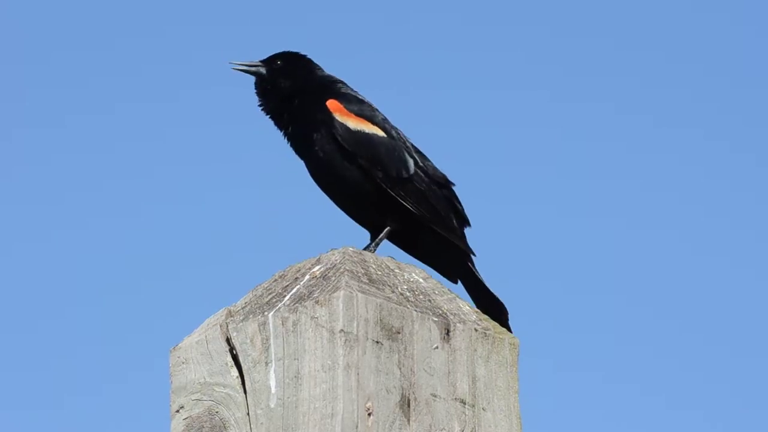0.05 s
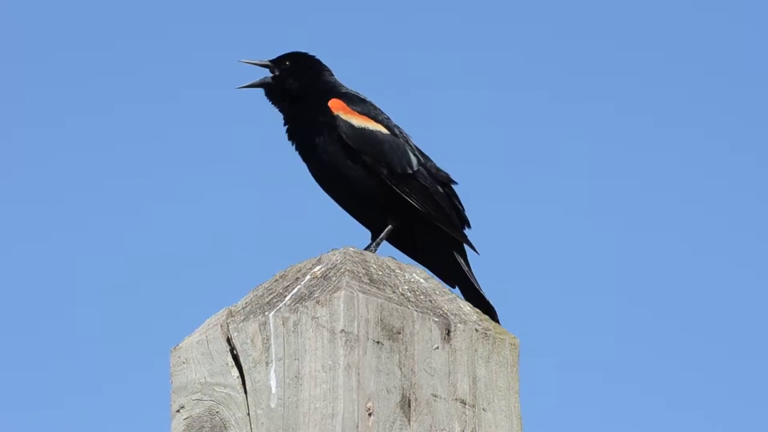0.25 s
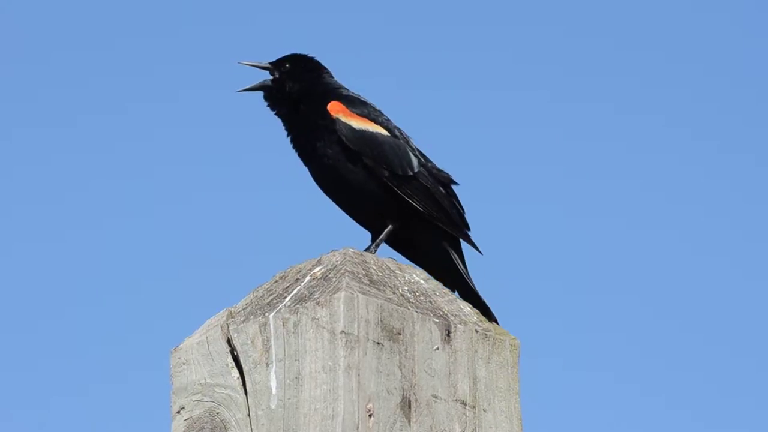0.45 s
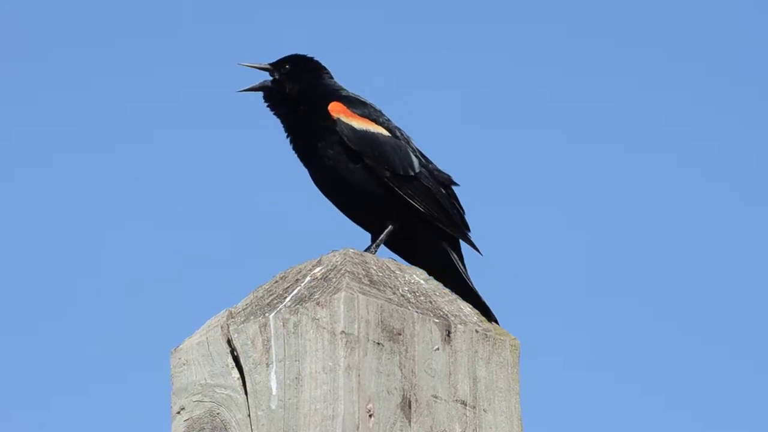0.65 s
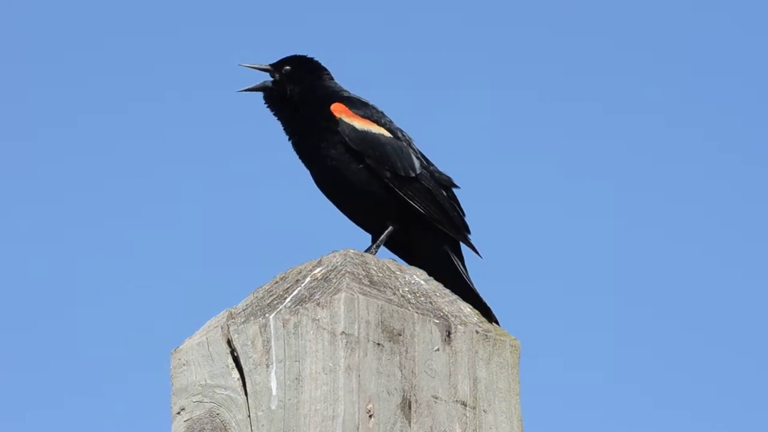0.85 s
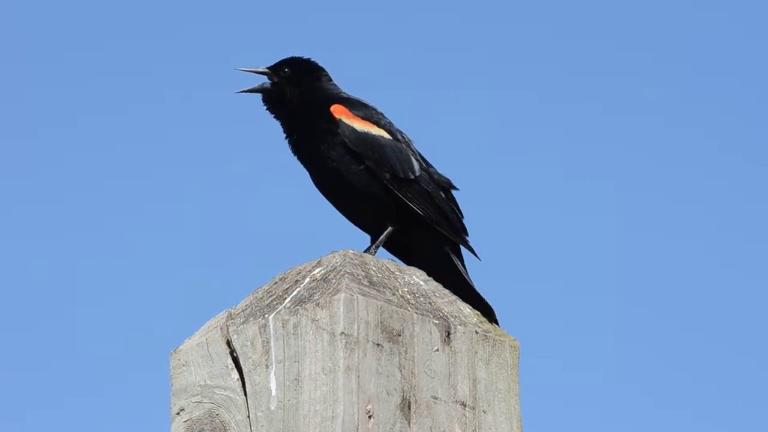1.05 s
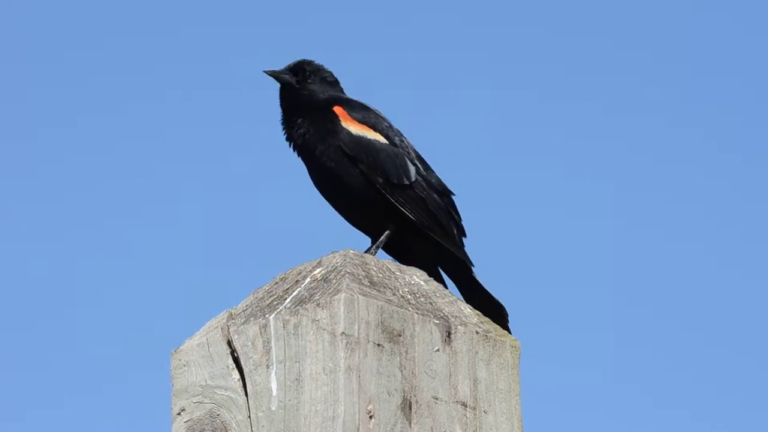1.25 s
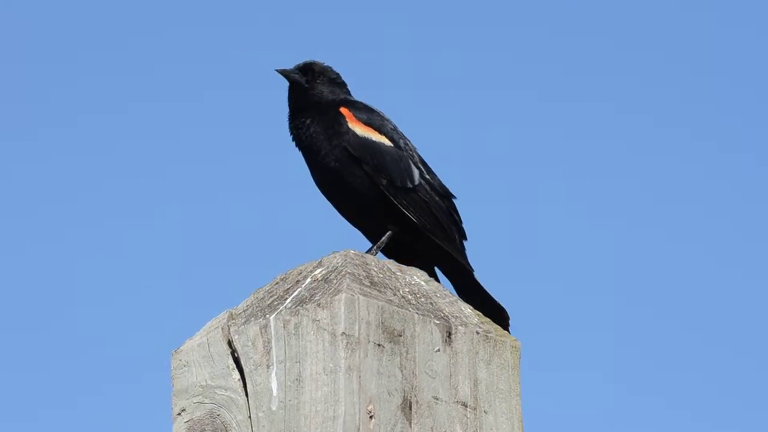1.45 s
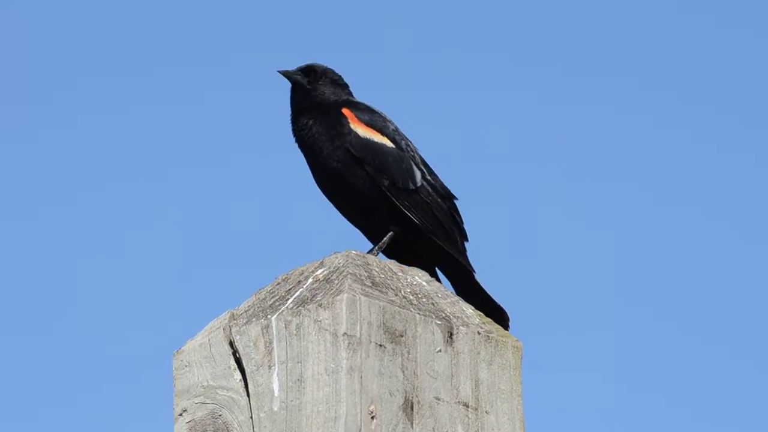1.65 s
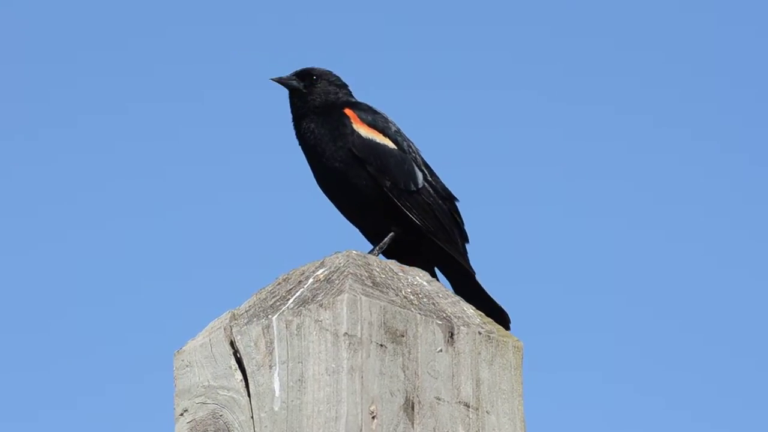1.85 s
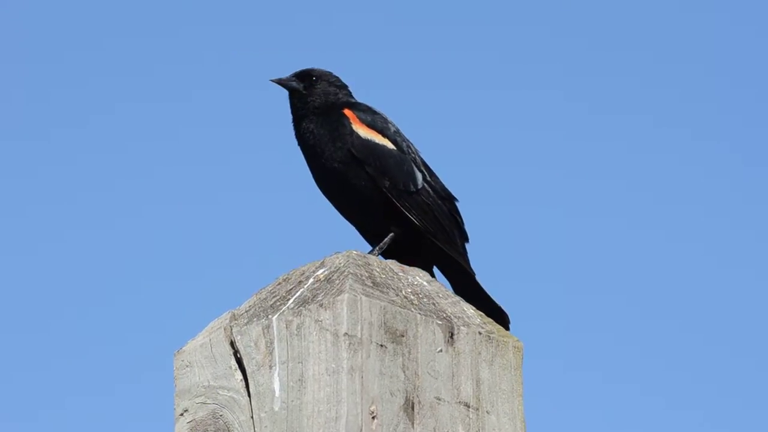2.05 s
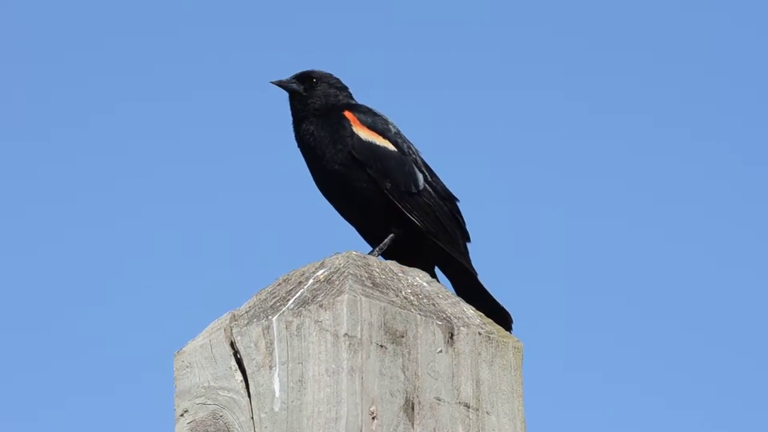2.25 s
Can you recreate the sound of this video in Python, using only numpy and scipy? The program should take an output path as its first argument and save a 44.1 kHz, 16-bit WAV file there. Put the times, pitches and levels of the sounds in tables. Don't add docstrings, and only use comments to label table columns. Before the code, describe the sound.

One blackbird sings close to the microphone in an open field: soft gurgled notes, a loud clear whistle, then a fast buzzing trill ending after one second, leaving faint distant birds and low traffic rumble.

```python
import sys
import numpy as np
from scipy import signal
from scipy.fft import rfft, irfft
from scipy.io import wavfile
from scipy.ndimage import uniform_filter1d

SR = 44100
rng = np.random.default_rng(int(sys.argv[2]) if len(sys.argv) > 2 else 0)


def linear_from_db(decibels):
    return 10 ** (np.asarray(decibels, float) / 20)


def digitize_waveform(pressure):
    field = np.atleast_2d(pressure).T
    bounded = np.clip(field, -1, 1)
    quanta = np.round(bounded * 32767).astype(np.int16)
    wavfile.write(sys.argv[1], SR, quanta)


N = 101429

# multiple of the pitch, level in dB.
UPPER_TONE = [(1, -2.5), (2.5, -52), (4.4, -53), (5.2, -54)]


def evened(x):
    return x / np.sqrt(np.mean(x ** 2) + 1e-20)


def add(mix, start_s, sound):
    part = mix[max(round(start_s * SR), 0):][:len(sound)]
    part += sound[:len(part)]


def wobble(count, hz):
    size = max(int(SR / hz / 2), 2)
    once = uniform_filter1d(rng.standard_normal(count), size)
    return evened(uniform_filter1d(once, size))


def sing(pitch_hz, tone, jitter, shimmer_db, open_db=0, blur_hz=900, effort_db=0):
    blur_from_hz = 5900
    count = len(pitch_hz)
    unsteady_hz = pitch_hz * (1 + jitter * wobble(count, 300))
    phase = 2 * np.pi * (np.cumsum(unsteady_hz) / SR + rng.random())
    wave = 0
    for multiple, partial_db in tone:
        smear = 1
        if blur_hz and multiple * np.mean(pitch_hz) > blur_from_hz:
            smear = wobble(count, blur_hz * multiple / 4) * linear_from_db(effort_db)
        beak_db = open_db * (multiple in (2, 3))
        wave = wave + linear_from_db(partial_db + beak_db) * smear * np.cos(multiple * phase)
    return np.sqrt(2) * wave * linear_from_db(shimmer_db * wobble(count, 200))


def rasp(count):
    # centre in Hz, width in Hz, level in dB.
    throat = [(2672.5, 530, -0.5), (3186, 67, 4.5), (3550, 180, 2.5), (3880, 280, -6), (4473, 1000, -14.5),
              (4910, 250, -14.5), (6800, 3500, -46.5)]
    bin_hz = np.fft.rfftfreq(count, 1 / SR)
    colour = 0
    for mid_hz, width_hz, peak_db in throat:
        colour = colour + linear_from_db(peak_db) / (1 + (2 * (bin_hz - mid_hz) / width_hz) ** 4)
    return evened(irfft(rfft(rng.standard_normal(count)) * colour, count))


def note(curve, tone, beat_hz=0, beat=0, jitter=0.0051, shimmer_db=3.0, blur_hz=900, haze_db=-30):
    s, pitch_hz, level_db, *beak = np.transpose(curve)
    t = np.arange(s[0], s[-1], 1 / SR)
    t_db = np.interp(t, s, level_db)
    open_db = np.interp(t, s, beak[0]) if beak else 0
    effort_db = .3 * (t_db - level_db.max())
    wave = sing(np.interp(t, s, pitch_hz), tone, jitter, shimmer_db, open_db, blur_hz, effort_db)
    wave = wave + linear_from_db(haze_db) * rasp(len(t))
    loudest_s = s[np.argmax(level_db)]
    beating = 1.5 + beat * np.cos(2 * np.pi * beat_hz * (t - loudest_s))
    edge = np.minimum(np.minimum(t - s[0], s[-1] - t) / .0015, 1)
    return s[0], wave * beating * edge * linear_from_db(uniform_filter1d(t_db, size=31))


def products(mix, low, high, db, order):
    start_s, end_s = max(low[0][0], high[0][0]), min(low[-1][0], high[-1][0])
    t = np.arange(start_s, end_s, 1 / SR)
    low_s, low_hz, low_db = np.transpose(low)
    high_s, high_hz, high_db = np.transpose(high)
    weaker_db = np.minimum(np.interp(t, low_s, low_db), np.interp(t, high_s, high_db))
    level = linear_from_db(weaker_db + db) * signal.windows.tukey(len(t), .2)
    for low_times, high_times, side_db in order:
        side_hz = low_times * np.interp(t, low_s, low_hz) + high_times * np.interp(t, high_s, high_hz)
        add(mix, t[0], level * sing(side_hz, [(1, side_db)], 0.0081, 4.1))


def intro():
    # time in seconds, pitch in Hz, level in dB.
    hum, partner, gulp = [(0, 1507, -35), (.008, 1491, -39), (.018, 1519, -29), (.036, 1550, -41.5),
                          (.11, 1527, -32.5), (.117, 1488, -32.5), (.123, 1591, -28.5), (.16, 1560, -31.5),
                          (.188, 1548, -43.5)], [(.116, 1778, -48.5), (.121, 1847, -23), (.14, 1884, -31.5),
                                       (.148, 1930, -34.5), (.16, 1878, -28.5), (.19, 1850, -44.5)], [(.18, 1186, -45), (.19, 1133, -27),
                                                        (.198, 1148, -23), (.207, 1253, -29),
                                                        (.214, 1187, -46.5)]
    chuck, squeak, bridge = [(.2, 2350, -45), (.212, 2480, -30), (.217, 2440, -31), (.2222, 2430, -19),
                             (.228, 2450, -30), (.237, 2480, -28.5), (.243, 2400, -36), (.256, 2580, -35),
                             (.262, 2500, -43)], [(.241, 3765, -50.5), (.248, 3777, -29), (.252, 3550, -28),
                                            (.257, 3463, -20.5), (.264, 3495, -25), (.279, 3490, -33),
                                            (.3, 3400, -47.5)], [(.26, 3390, -46), (.266, 3392, -31.5),
                                                            (.273, 3380, -36), (.279, 3400, -33),
                                                            (.29, 3320, -45.5), (.305, 3320, -54)]
    # time in seconds, pitch in Hz, level in dB, beak opening in dB on partials 2 and 3.
    whistle = [(.278, 2520, -42.5, 21.5), (.294, 2511, -23, 7), (.307, 2493, -11.5, -1),
               (.324, 2477, -11, -15), (.339, 2476, -10.5, 0.5), (.349, 2468, -21.5, 24.5),
               (.356, 2516, -20, 18.5), (.384, 2513, -26.5, 29), (.402, 2505, -39.5, 20.5)]
    # multiple of the pitch, level in dB.
    hum_tone, partner_tone, pure_tone = [(1, -4), (2, -26), (4, -40)], [(1, -5), (3.4, -33), (5.8, -47), (7.5, -52)], [(1, -1.5), (2, -36.5),
                                                                                 (3, -69.5), (4, -62.5),
                                                                                 (5, -48.5), (6, -60)]
    chuck_tone, squeak_tone, bridge_tone = [(1, -1), (2.6, -44), (4.6, -49)], [(1, -2.5), (2, -42), (4, -49.5)], [(.5, -7), (1, -9.5),
                                                                                     (1.5, -9.5), (2, -29),
                                                                                     (3, -41), (4, -42)]
    song = np.zeros(N)
    add(song, *note(hum, hum_tone, jitter=.003, shimmer_db=1.8, blur_hz=0))
    add(song, *note(partner, partner_tone, jitter=0.015, shimmer_db=3.0))
    add(song, *note(gulp, pure_tone, beat_hz=115, beat=.2, shimmer_db=1))
    add(song, *note(chuck, chuck_tone, beat_hz=260, beat=.9, jitter=.014, shimmer_db=1, haze_db=-28))
    add(song, *note(squeak, squeak_tone, beat_hz=265, beat=.5, jitter=.024, shimmer_db=1.5, haze_db=-11))
    add(song, *note(bridge, bridge_tone, jitter=0.011, shimmer_db=4.0))
    add(song, *note(whistle, pure_tone, jitter=0.0016, shimmer_db=0.62, blur_hz=0, haze_db=-47))
    early = [(0, 2356, -53.5), (.06, 2354, -56.5), (.105, 2375, -46.5), (.116, 2387, -38.5), (.123, 2262, -48)]
    add(song, *note(early, UPPER_TONE, beat_hz=320, beat=.4, jitter=0.004, shimmer_db=4.0))
    order = [(-1, 1.5, 3.5), (-1, 2, 3.0), (-4.0, 1.5, -11.0), (2.5, -0.5, -6.5)]
    products(song, hum, partner, -13.0, order)
    return song


def buzz(start_s, length_s, db, rise_s, fade_s=0):
    # multiple of the pitch, level in dB.
    buzz_tone = [(.5, -11.5), (1, -4.5), (1.5, -19), (3, -44.5)]
    warble_hz, sweep_low_hz, sweep_top_hz, dwell = 124.16, 2640, 4024, 1.8
    lower_hz, lower_swing, lower_db = 3250, 0.036, -4
    rasp_db, fall_s = 3, .014
    length_s = length_s + fade_s
    t = np.arange(0, length_s, 1 / SR)
    cycle = 2 * np.pi * np.cumsum(warble_hz * (1 + 0.069 * wobble(len(t), 79))) / SR

    up = (.5 - .5 * np.cos(cycle)) ** dwell
    top_hz = sweep_top_hz * (1 + 0.051 * wobble(len(t), 74))
    upper = sing(sweep_low_hz + (top_hz - sweep_low_hz) * up, buzz_tone[1:2], 0.016, 2.8)
    upper = upper * (1 + 0.61 * np.sin(cycle))

    lower = sing(lower_hz * (1 + lower_swing * np.sin(cycle + 0.68)), buzz_tone, 0.022, 4.8)
    lower = lower * (1 - 0.4 * np.cos(cycle + 1.8))
    breath = rasp(len(t)) * (1 - 0.18 * np.cos(cycle))

    ramps = np.minimum((t / rise_s) ** 2, (length_s - t) / (fall_s + 2 * fade_s))
    shape = np.sin(np.pi / 2 * np.minimum(ramps, 1)) * linear_from_db(-5 * t / length_s)
    return start_s, linear_from_db(db) * shape * (upper + linear_from_db(lower_db) * lower + linear_from_db(rasp_db) * breath)


def trill():
    # start in seconds, length in seconds, level in dB, rise in seconds.
    first_buzz = (.377, .102, -22, .058)
    # start in seconds, strength in dB, blip level in dB, chord pitch ratio.
    turns = [(0.4790, 0.07, .5, 1.008), (0.5781, 0, -2, 1), (0.6775, -0.66, -.6, 1),
             (0.7764, -1.03, 0, .998), (0.8759, -1.56, -.6, 1), (0.9757, -2.71, 1.5, 1)]
    # seconds after its start, pitch in Hz, level in dB.
    blip, upper_voice, lower_voice = [(-.0012, 2590, -35.5), (.0006, 2600, -13.5), (.0027, 2600, -24),
                                      (.005, 2620, -12.5), (.0072, 2700, -20), (.009, 2760, -35)], [(.009, 2600, -40.5), (.014, 2610, -28.5),
                                                    (.024, 2620, -27), (.04, 2640, -22.5),
                                                    (.049, 2740, -19), (.053, 2760, -35.5)], [(.008, 3150, -27), (.014, 3150, -28),
                                                                   (.028, 3145, -27.5), (.043, 3100, -19.5),
                                                                   (.047, 3320, -33.5), (.051, 3500, -33),
                                                                   (.055, 3550, -42.5)]
    # multiple of the pitch, level in dB.
    lower_tone = [(.5, -22), (1, 0), (1.5, -15), (2, -40), (2.5, -54), (3, -58), (4.5, -54)]
    buzz_after_s, buzz_s, buzz_db, buzz_rise_s, last_fade_s = .048, 0.055, -25, .008, .036
    song = np.zeros(N)
    add(song, *buzz(*first_buzz))
    for start_s, turn_db, blip_db, ratio in turns:
        tuning, shift = np.array([1, ratio, 1]), np.array([start_s, 0, turn_db])
        upper = upper_voice * tuning + shift
        lower = lower_voice * tuning + shift
        blip_now = blip + np.array([start_s, 0, blip_db])
        add(song, *note(blip_now, UPPER_TONE[::3], jitter=.004, shimmer_db=-0.5))
        add(song, *note(upper, UPPER_TONE, beat_hz=110, beat=.55, jitter=.017, shimmer_db=3, haze_db=-18))
        add(song, *note(lower, lower_tone, jitter=0.004, shimmer_db=0.2, blur_hz=200, haze_db=-24))
        products(song, lower, upper, -22, order=[(.5, 1, 3.5), (-1, 2, -3.5), (2.5, -0.75, -16)])
        fade_s = last_fade_s * (start_s == turns[-1][0])
        add(song, *buzz(start_s + buzz_after_s, buzz_s, buzz_db + turn_db, buzz_rise_s, fade_s))
    return song


def air(bird):
    # frequency in Hz, level in dB per Hz.
    beak_hiss = [(6000, -14.5), (8000, -12), (9300, -18), (11000, -4.5), (12200, -6), (14000, -1.5),
                 (15500, -7.5)]
    # time in seconds, level in dB.
    pressure = [(.07, -15.5), (.11, 10), (.17, 3), (.2, -3), (.27, 8.5), (.29, -23.5), (.44, -24.5),
                (0.499, -6.5), (.8, -4), (1.03, 3.5), (1.071, -10)]
    air_db, smooth_s = -46.5, .014
    effort = np.sqrt(abs(uniform_filter1d(bird ** 2, size=max(int(smooth_s * SR), 2))))
    growth = linear_from_db(np.interp(np.arange(N) / SR, *np.transpose(pressure)))
    return effort * growth * wash(beak_hiss, air_db, patchy_db=1.5, swell_db=4.0)


def echoes(x, t60_s, delay_s):
    at = np.arange(int(delay_s * SR), SR, 20)
    at = at + rng.integers(0, 20, len(at))
    taps = np.zeros(SR + 20)
    taps[at] = rng.choice([-1., 1.], len(at)) * linear_from_db(-60 * at / SR / t60_s)
    return signal.fftconvolve(x, taps / np.linalg.norm(taps))[:N]


def far_birds():
    # start in seconds, length in seconds, pitch in Hz, glide in Hz, level in dB.
    clear_calls = [
        (1.21, 0.188, 3530, -80, -64.5),
        (1.21, 0.19, 3840, -94, -66),
        (2.175, 0.13, 3306, -61, -50.5),
    ]
    hoarse_calls = [(1.15, 0.035, 2230, 198, -56), (1.22, 0.041, 2550, -18, -56),
                    (1.462, 0.041, 2270, 171, -54.5), (2.13, 0.041, 2410, 196, -57.5),
                    (2.205, 0.075, 2950, -22, -59), (2.282, 0.033, 2845, 149.5, -48)]
    calls_mix = np.zeros(N)
    for calls, jitter in ((clear_calls, .004), (hoarse_calls, .035)):
        for start_s, length_s, pitch_hz, glide_hz, call_db in calls:
            along = np.linspace(0, 1, int(length_s * SR))
            call = sing(pitch_hz + glide_hz * along, [(0.99, 0)], jitter, 3.2)
            add(calls_mix, start_s, linear_from_db(call_db) * np.sin(np.pi * along) ** 2 * call)
    return calls_mix


def wash(spectrum, db, patchy_db, swell_db):
    frames, bin_hz = N // 256 + 5, np.fft.rfftfreq(1024, 1 / SR)
    real, imag, patches = rng.standard_normal((frames, 513, 3)).T
    patches = uniform_filter1d(patches, size=10, axis=0)
    patches = evened(uniform_filter1d(patches, size=12, axis=1))
    swell = evened(uniform_filter1d(rng.standard_normal(frames), size=30))
    knot_hz, knot_db = np.transpose(spectrum)
    colour_db = np.interp(np.log(bin_hz + 1), np.log(knot_hz + 1), knot_db, left=-90, right=-90)
    gain = linear_from_db(colour_db[:, None] + patchy_db * patches + swell_db * swell)
    noise = signal.istft((real + 1j * imag) * gain, nperseg=1024, noverlap=768)[1]
    return linear_from_db(db) * evened(noise[:N])


def field_noise():
    # frequency in Hz, level in dB.
    traffic, insects = [(20, -37), (45, -10.5), (100, 1.5), (250, -3), (420, -10.5), (1150, -6),
                        (2000, -22), (3600, -42)], [(3600, -8), (4000, 1), (4500, -11), (5600, -14), (7000, -23),
                                         (10000, -25), (16000, -30)]
    rumble = wash(traffic, -38.5, patchy_db=0.4, swell_db=1.3)
    return rumble + wash(insects, -69.5, patchy_db=1.6, swell_db=-0.8)


def scene():
    near_t60_s, near_db = .17, -12
    field_t60_s, field_db = .7, -30
    bird = intro() + trill()
    bird = bird + air(bird)
    near = linear_from_db(near_db) * echoes(bird, near_t60_s, .004)
    field = linear_from_db(field_db) * echoes(bird, field_t60_s, 0.029)
    far = far_birds()
    far = far + 0.24 * echoes(far, 0.17, .005)
    return (bird + near + field + far + field_noise())[None]


def band_limit(x):
    return signal.sosfilt(signal.butter(12, 15830, fs=SR, output="sos"), x)


def record(dry):
    return band_limit(dry)


dry = scene()
out = record(dry)
digitize_waveform(out)
```